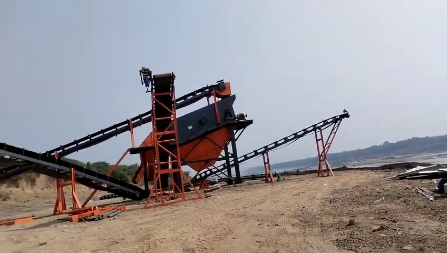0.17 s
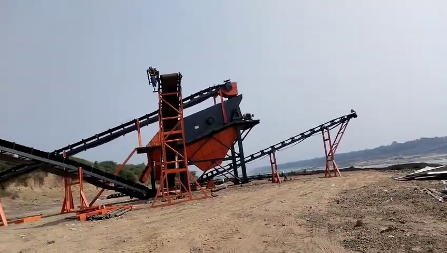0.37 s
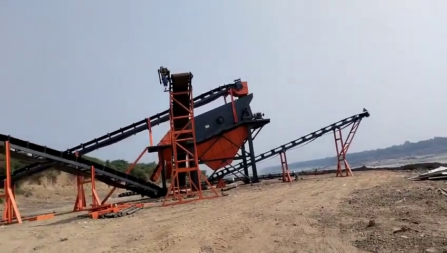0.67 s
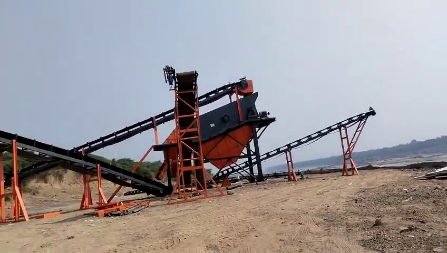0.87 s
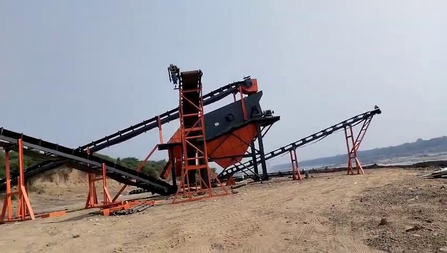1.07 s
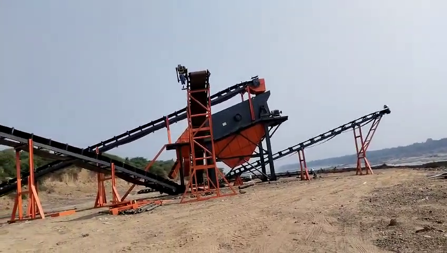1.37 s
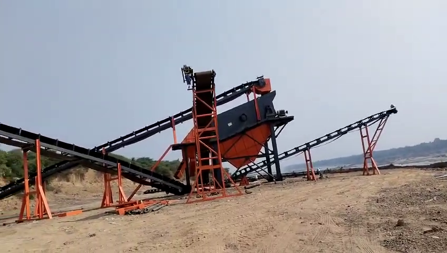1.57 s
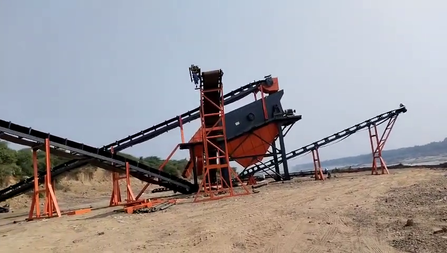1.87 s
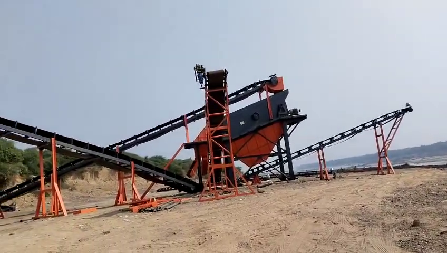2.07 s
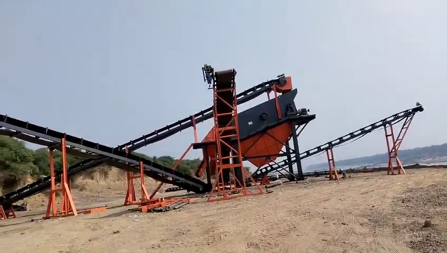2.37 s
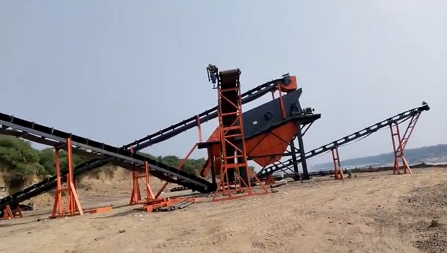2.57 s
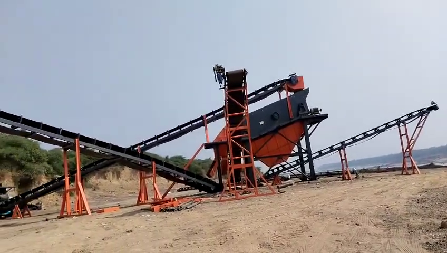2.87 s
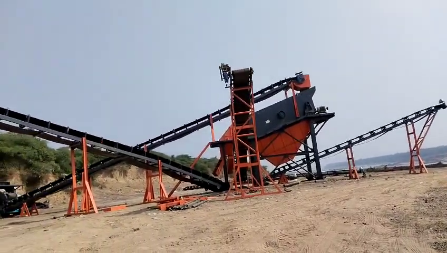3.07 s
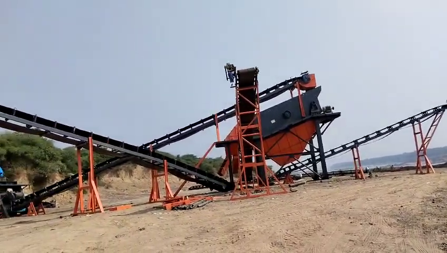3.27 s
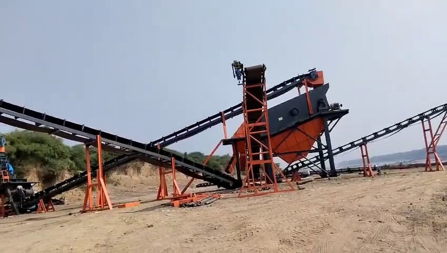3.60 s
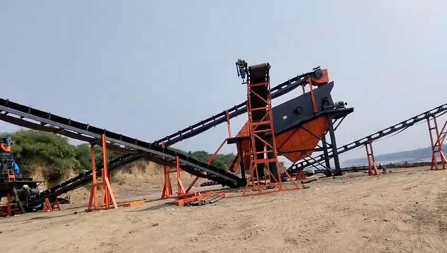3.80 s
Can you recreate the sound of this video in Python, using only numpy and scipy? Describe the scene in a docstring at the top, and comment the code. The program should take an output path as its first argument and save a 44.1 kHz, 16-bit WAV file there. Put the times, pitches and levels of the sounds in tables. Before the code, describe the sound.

Heavy quarry crusher and screen roar steadily over clattering diesels, with stones banging on steel.

```python
"""A stone crushing plant across a quarry yard: screens roar and grit hisses throughout, as shaped noise and rings.
A four-cylinder diesel idles beside a fixed-speed diesel: summed engine orders that beat about three times
a second, plus noise bursts at each firing. Stones crack and boom on a steel chute from 0.7 s and again from 1.9 s.
From 2.6 s the first diesel is opened up: its pitch jumps and its fan is heard, while its clatter fades
as the listener turns away."""
import sys
import numpy as np
from scipy import signal
from scipy.fft import rfft, irfft
from scipy.io import wavfile
from scipy.ndimage import uniform_filter1d

SR = 44100
rng = np.random.default_rng(int(sys.argv[2]) if len(sys.argv) > 2 else 0)


def materialize(psi):
    """Save the field psi as 16-bit PCM at rate SR to the path in sys.argv[1].

    A 1-D psi becomes a single channel; in a 2-D psi each row is a channel.
    """
    bounded = np.clip(np.atleast_2d(psi).T, -1, 1)
    quanta = np.round(bounded * 32767).astype(np.int16)
    wavfile.write(sys.argv[1], SR, quanta)


N = 173754
TIME, FREQS = np.arange(N) / SR, np.arange(N // 2 + 1) * SR / N


def undb(db):
    """Decibels to gain."""
    return 10 ** (np.asarray(db) / 20)


def curve(rows):
    """Joins (time_s, value) rows with straight lines."""
    return np.interp(TIME, *np.array(rows).T)


def across(rows):
    """Joins (freq_hz, value) rows on a log-frequency axis."""
    hz, value = np.array(rows).T
    return np.interp(np.log(FREQS + 1), np.log(hz), value)


def colour(x, rows):
    """Normalises a white signal and gives it the spectrum in rows (freq_hz, density_db_per_hz)."""
    spectrum = rfft(x / x.std())
    return irfft(spectrum * undb(across(rows)) * np.sqrt(SR / 2), N)


def noise():
    """Two unrelated white noises: the direct sound and the scattered sound."""
    return rng.standard_normal((2, N))


def walk(rate_hz):
    """Random levels held 1 / rate_hz and slewed twice; spread 1."""
    hold = max(int(SR / rate_hz), 1)
    steps = rng.standard_normal(N)[np.arange(N) // hold]
    slewed = uniform_filter1d(uniform_filter1d(steps, hold), hold)
    return slewed / slewed.std()


PITCH_DRIFT = .006  # fraction of mode frequency


def ringing(modes):
    """Steel resonances kept ringing by dense random excitation; their pitch drifts a little."""
    drive, out = rfft(noise()), 0
    for hz, width_hz, level_db in modes:
        response = 1 / (1 + 2j * (FREQS - hz) / width_hz) ** 2
        ring = signal.hilbert(irfft(drive * response, N))
        drift_cycles = hz * PITCH_DRIFT * np.cumsum(walk(5)) / SR
        ring = (ring * np.exp(2j * np.pi * drift_cycles)).real
        out = out + undb(level_db) * ring / ring.std()
    return out


# roar of screen and belts: freq_hz, density_db_per_hz
ROAR_SPECTRUM = [(15, -95), (30, -70), (42, -53.5), (90, -57), (175, -55), (215, -58.5), (280, -66),
                 (450, -72.5), (650, -71), (1100, -72), (1650, -69), (2200, -61.5), (3200, -66),
                 (5000, -88), (15000, -105)]
# ringing steel panels: freq_hz, width_hz, level_db_rms
PANEL_MODES = [(233.7, 13.4, -46), (310.3, 22, -49), (355.2, 34, -50.5), (490, 8.5, -56), (589, 8.5, -53.5),
               (770, 41, -48.5), (818, 23, -49), (943, 44, -48.5), (1015, 34, -52), (1207, 36, -48),
               (2485, 100, -46.5), (2626, 24, -52)]
# thin rings of the belt rollers: freq_hz, width_hz, level_db_rms
ROLLER_MODES = [(4215, 70, -52), (5620, 20, -61), (6718, 40, -58), (7947, 40, -63), (9461, 45, -64)]


def screen():
    """Tumbling stone on screen and belts is broadband noise; panels and rollers add narrow resonances."""
    return colour(noise(), ROAR_SPECTRUM) + ringing(PANEL_MODES + ROLLER_MODES)


# grit sliding over steel: freq_hz, density_db_per_hz
GRIT_SPECTRUM = [(2000, -101), (4000, -69), (5400, -77), (6200, -75), (7700, -79), (9500, -82),
                 (10500, -80.5), (12300, -88), (15000, -94)]
# grit flow: time_s, level_db
GRIT_FLOW = [(0, -2), (.45, -0.5), (.6, 3), (1, 2.5), (1.17, -5), (1.3, -1.5), (2, -1), (2.12, -2.5),
             (2.27, 0), (2.42, -7.5), (2.5, -1), (2.8, -0.5), (2.97, -4.5), (3.3, -2), (3.6, -8),
             (3.94, -2.5)]
# bright bands in the hiss: freq_hz, width_hz, base_level_db_rms
HISS_MODES = [(6770, 830, -48.5), (9510, 1150, -47), (12100, 4800, -50)]
# gain on those bands: time_s, lower_db, middle_db, upper_db
HISS_MODE_GAIN = [(0, -17, 3, 0), (.7, 2, 3, -4), (1.3, 0, -3, -8), (2.3, 6.5, -12, -12),
                  (2.5, -3, -8, -12), (2.82, 10, -9, -10), (3.1, 1.5, -8, -8), (3.94, 3, -0.5, 1.5)]
GRIT_FLUTTER_DB = .9


def grit(grain_db):
    """Fine grains hiss over steel in an uneven stream; three bright bands come and go."""
    grains = noise() * undb(grain_db * walk(1500))
    hiss = colour(grains, GRIT_SPECTRUM) * undb(curve(GRIT_FLOW))
    for k, mode in enumerate(HISS_MODES):
        gain_db = curve([(time_s, gains_db[k]) for time_s, *gains_db in HISS_MODE_GAIN])
        hiss = hiss + ringing([mode]) * undb(gain_db)
    return hiss * undb(GRIT_FLUTTER_DB * walk(17))


# stones that hit the chute: start_s, level_db, crack_decay_s
STONE_HITS = [(.72, -4.2, .028), (.762, -8.5, .03), (.89, -9, .02), (.935, -9, .015), (1.942, -1.2, .038),
              (2.015, -9, .02)]
# crack of the stone: freq_hz, density_db_per_hz
CRACK_SPECTRUM = [(300, -80), (700, -60), (900, -57), (1250, -54), (1550, -57), (2200, -65), (5000, -85),
                  (15000, -110)]
# boom of the chute: freq_hz, density_db_per_hz
BOOM_SPECTRUM = [(150, -68), (330, -57), (500, -55.5), (700, -61), (1200, -76), (15000, -130)]
BOOM_RISE_S, BOOM_STRETCH = .004, 2.3  # stretch: boom decay / crack decay


def stones(tumble_db):
    """Each stone cracks against the chute, which swells into a soft, longer boom."""
    crack, boom = 0, 0
    for start_s, level_db, decay_s in STONE_HITS:
        age_s = np.maximum(TIME - start_s, 0)
        crack = crack + undb(level_db) * (age_s > 0) * np.exp(-age_s / decay_s)
        swell = 1 - np.exp(-age_s / BOOM_RISE_S)
        boom = boom + undb(level_db) * swell * np.exp(-age_s / (BOOM_STRETCH * decay_s))
    cracks = colour(noise(), CRACK_SPECTRUM) * uniform_filter1d(crack, size=220)  # 5 ms edges
    booms = colour(noise(), BOOM_SPECTRUM) * boom
    return (cracks + booms) * undb(tumble_db * walk(150))


WOBBLE_CYCLES, ROUGHNESS, WANDER_TURNS = .0007, .2, .04


def exhaust(cycles, orders, firings_per_cycle):
    """Engine orders: multiples of the firing rate line up into puffs, the others spread and waver more."""
    out, wobble = 0, WOBBLE_CYCLES * walk(12)
    for order, level_db in orders:
        order = round(order)
        uneven = order % firings_per_cycle > 0
        spread = (order / firings_per_cycle) ** 2  # whole turns for firing multiples
        turns = order * (cycles + wobble) + spread + uneven * WANDER_TURNS * walk(3.98)
        roughness = 1 + uneven * ROUGHNESS * walk(6.09)
        out = out + undb(level_db) * roughness * np.cos(2 * np.pi * turns)
    return out


CASING_DECAY_S = 0.0095


def casing(x, ring):
    """Adds the short ring of a metal casing with many close modes."""
    tail = rng.standard_normal(N) * np.exp(-TIME / CASING_DECAY_S)
    return irfft(rfft(x) * (1 + ring * rfft(tail) / np.linalg.norm(tail)), N)


KNOCK_RISE_S = 0.0053


def knocks(firings, pattern_db, decay, hold, scatter_db, rattle_db):
    """Rattle bursts at each firing; decay is a share of the interval, hold a constant floor."""
    index, phase = np.floor(firings).astype(int), firings % 1
    scatter = scatter_db * rng.uniform(-2.5, -.5, 256)[index]
    size = undb(np.array(pattern_db)[index % len(pattern_db)] + scatter)
    burst = size * np.exp(-phase / decay)
    gate = uniform_filter1d(burst, size=int(KNOCK_RISE_S * SR) + 1) + hold
    rattle = undb(rattle_db * np.tanh(walk(600)))
    return casing(noise() * gate * rattle, ring=.6)


# exhaust and casing: order (multiple of four-stroke cycle), level_db
STEADY_ORDERS = [(2, -50), (4, -32.3), (6, -35.5), (7, -46), (8, -42), (10, -45), (12, -41), (14, -50),
                 (15, -47), (26, -50), (30, -57)]
# knock on the two turns of a cycle: relative_level_db
TURN_PATTERN_DB = [-1.5, 1.5]
# knock: freq_hz, density_db_per_hz
STEADY_KNOCK_SPECTRUM = [(300, -67), (600, -78), (1200, -66.5), (1550, -68.5), (1950, -59), (2450, -62.5),
                         (2900, -69.5), (3600, -69.5), (4800, -82), (7000, -82), (15000, -97)]
# knock: time_s, level_db
STEADY_KNOCK_LEVEL = [(0, -6), (1, -4), (2, 0.5), (2.8, 2.5), (3.3, 1.5), (3.94, 1)]
SHAFT_HZ, STEADY_PUFF_S, STEADY_KNOCK_S = 23.68, .018, .004  # shaft speed, first puff, first knock


def steady_diesel():
    """The fixed-speed engine: a steady throb and a knock on every turn of the shaft."""
    cycles = SHAFT_HZ * (TIME - STEADY_PUFF_S) / 2
    note = exhaust(cycles, STEADY_ORDERS, 2)
    turns = SHAFT_HZ * (TIME - STEADY_KNOCK_S)
    clatter = knocks(turns, TURN_PATTERN_DB, decay=0.32, hold=0.33, scatter_db=2, rattle_db=1)
    return note, colour(clatter, STEADY_KNOCK_SPECTRUM) * undb(curve(STEADY_KNOCK_LEVEL))


# rings of the engine block: freq_hz, cylinder_1_db, cylinder_2_db, cylinder_3_db, cylinder_4_db
BLOCK_MODES = [(1400, -46, -44, -32, -42), (1980, -32, -31, -31, -36), (2450, -24, -23, -26, -28),
               (3570, -22.5, -32, -27, -22), (6900, -41, -34, -40, -32)]
BLOCK_RISE_S, BLOCK_DECAY_S = .0015, .005
BLOCK_SCATTER_DB, BLOCK_DETUNE = 3.5, .04  # each +/-; detune is a fraction


def block(firings, hz):
    """Each cylinder strikes the engine block with its own mix of short rings, randomised per blow."""
    count = np.floor(firings).astype(int)
    age_s, out = firings % 1 / hz, 0
    envelope = np.exp(-age_s / BLOCK_DECAY_S) * (1 - np.exp(-age_s / BLOCK_RISE_S))
    for mode_hz, *cylinder_db in BLOCK_MODES:
        force, detune, start = rng.uniform(-1, 1, (256, 3))[count].T
        size = undb(np.array(cylinder_db)[count % len(cylinder_db)] + BLOCK_SCATTER_DB * force)
        blow_hz = mode_hz * (1 + BLOCK_DETUNE * detune)
        out = out + size * np.sin(2 * np.pi * blow_hz * age_s + np.pi * start)
    return out * envelope


# four-cylinder speed: time_s, firing_rate_hz
FIRING_RATE = [(0, 44.48), (0.25, 44.8), (0.5, 43.9), (1.1, 44.05), (1.3, 44.35), (1.6, 44.27),
               (2.62, 44.23), (2.93, 50.26), (3.25, 50.08), (3.55, 50.73), (3.75, 51.11), (3.94, 51.62)]
# load: time_s, exhaust_gain_db
LOAD_GAIN = [(0, -.5), (.2, 1.7), (.8, 1.7), (1.15, -.7), (2.5, -1.3), (2.78, 3.5), (3.0, .8), (3.3, 1.3),
             (3.6, .5), (3.94, -2.5)]
# exhaust note: order (multiple of four-stroke cycle), idle_db, opened_db
EXHAUST_ORDERS = [(4, -26.4, -28.5), (6, -47, -43), (7, -45, -36.5), (8, -29, -22.3), (9, -42, -49),
                  (10, -38, -37), (11, -41, -42), (12, -36, -32), (13, -41.5, -38.5), (14, -37, -45),
                  (15, -39, -47), (16, -36, -47), (20, -47.5, -47)]
# knock of each cylinder: relative_level_db
CYLINDER_PATTERN_DB = [2.5, -2.4, 1.3, -0.67]
# knock: freq_hz, density_db_per_hz
KNOCK_SPECTRUM = [(300, -94), (1400, -70), (1900, -73.5), (2500, -63), (2900, -65), (3500, -66),
                  (4250, -70.5), (5000, -78), (7000, -79), (9500, -91), (15000, -102)]
# knock, weaker as the listener turns away: time_s, level_db
KNOCK_FACING = [(0, 4), (.5, 2.5), (1.3, 1.5), (2.4, -2.5), (2.85, -5), (3.2, -14), (3.94, -30)]
IDLE_HZ, OPEN_HZ = 44.3, 50  # firing rates
PUFF_S, KNOCK_S = .0078, -.0035  # offsets of puffs and knocks
FAN_RATIO, FAN_DB = 4.61, -39.5  # blade passes per firing, level opened up


def main_diesel():
    """The four-cylinder engine: its speed sets the pitch, exhaust note shape, fan and knock rate."""
    hz = curve(FIRING_RATE)
    firings = np.cumsum(hz) / SR
    opened = np.clip((hz - IDLE_HZ) / (OPEN_HZ - IDLE_HZ), 0, 1)
    load_db = curve(LOAD_GAIN)
    orders = [(order, idle_db + opened * (opened_db - idle_db) + load_db)
              for order, idle_db, opened_db in EXHAUST_ORDERS]
    cylinders = len(CYLINDER_PATTERN_DB)
    note = exhaust((firings - PUFF_S * hz[0]) / cylinders, orders, cylinders)
    blows = firings - KNOCK_S * hz[0]
    clatter = knocks(blows, CYLINDER_PATTERN_DB, decay=0.53, hold=0.1, scatter_db=4.0, rattle_db=6.5)
    facing = undb(curve(KNOCK_FACING))
    fan_level = opened * undb(FAN_DB) * (1 + ROUGHNESS * walk(6))
    fan = fan_level * np.sin(2 * np.pi * FAN_RATIO * firings)
    return note + fan + block(blows, hz) * facing, colour(clatter, KNOCK_SPECTRUM) * facing


# microphone ports: freq_hz, left_over_right_db
BALANCE = [(60, -.7), (150, 0), (240, 5.2), (380, 4.9), (690, 3.5), (1000, 3), (1400, 5.4), (1950, 11.9),
           (2500, 10), (4350, 8.9), (7800, 12), (14800, 9)]
# freq_hz, left_lead_rad
PHASE = [(30, -.08), (130, -.3), (300, -1), (600, -1.9), (1500, -2.4), (2330, -.8), (3960, 0), (6630, 2.4),
         (9200, 3.6)]
# freq_hz, likeness_0_to_1
LIKENESS = [(60, .98), (150, .97), (300, .85), (600, .88), (2200, .86), (4000, .63), (8000, .42),
            (14000, .2)]


def ports(direct, scattered):
    """The right port differs in level and phase by frequency, and shares less of the sound in the treble."""
    alike = np.clip(across(LIKENESS), 0, 1)
    right = alike * rfft(direct) + np.sqrt(1 - alike ** 2) * rfft(scattered)
    shading = undb(-across(BALANCE)) * np.exp(-1j * across(PHASE))
    return np.array([direct, irfft(right * shading, N)])


def scene():
    """Both engines and the flow of stone, heard mostly from the left."""
    stone = screen() + grit(grain_db=2) + stones(tumble_db=1.5)
    throb, knock = steady_diesel()
    note, clatter = main_diesel()
    direct, scattered = stone + knock + clatter
    return ports(direct + note + throb, scattered)


LOW_HZ, TOP_HZ = 30, 15450


def record(dry):
    """The microphone thins the deepest bass; the recorder cuts the top steeply."""
    low_cut = signal.butter(2, LOW_HZ, "high", fs=SR, output="sos")
    top_cut = signal.ellip(10, .2, 80, TOP_HZ, fs=SR, output="sos")  # ripple dB, stopband dB
    return signal.sosfilt(top_cut, signal.sosfilt(low_cut, dry))


dry = scene()
out = record(dry)
materialize(out)
```